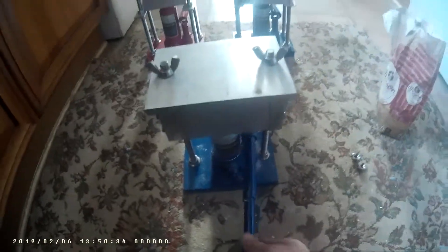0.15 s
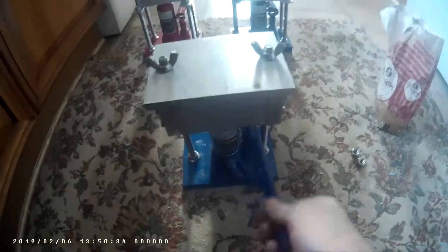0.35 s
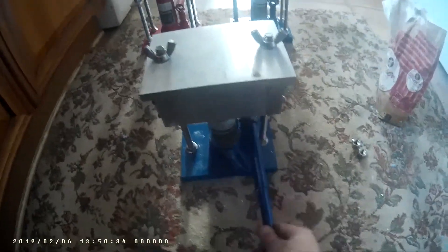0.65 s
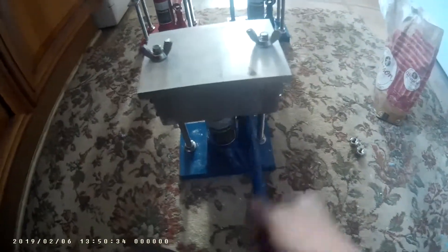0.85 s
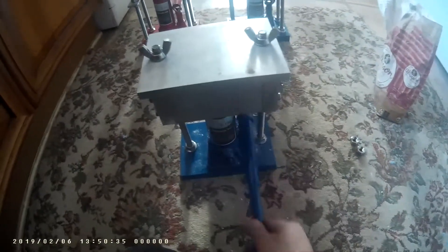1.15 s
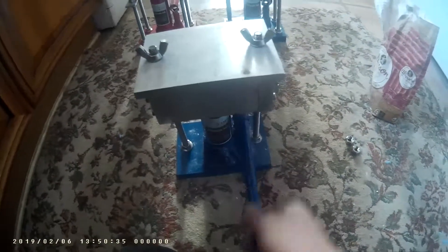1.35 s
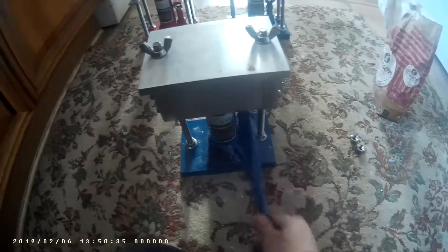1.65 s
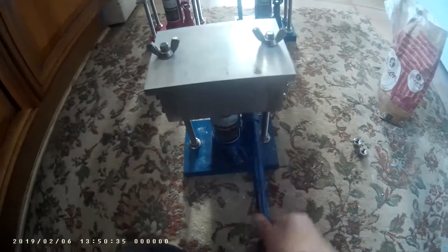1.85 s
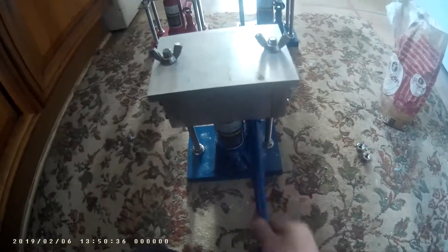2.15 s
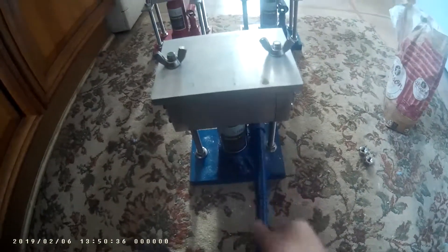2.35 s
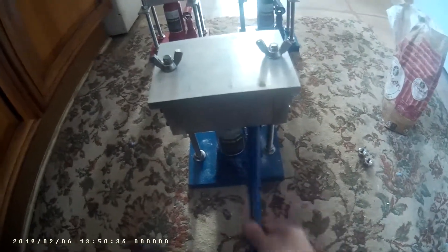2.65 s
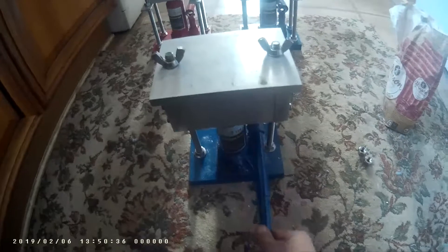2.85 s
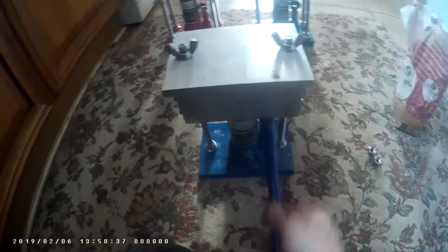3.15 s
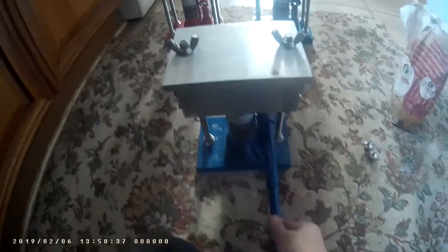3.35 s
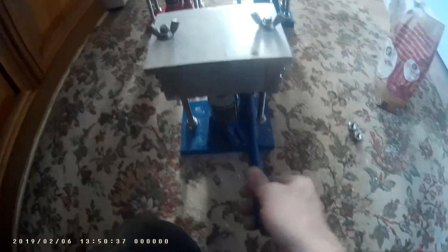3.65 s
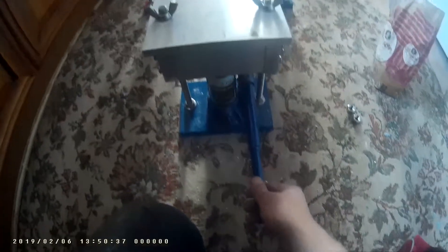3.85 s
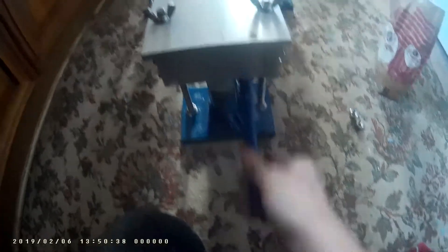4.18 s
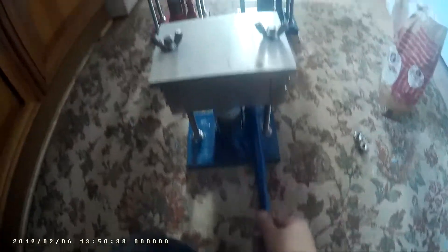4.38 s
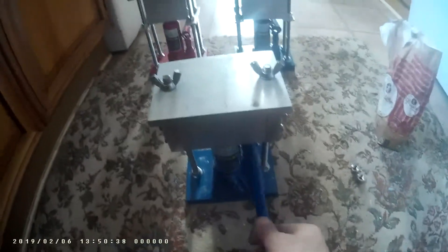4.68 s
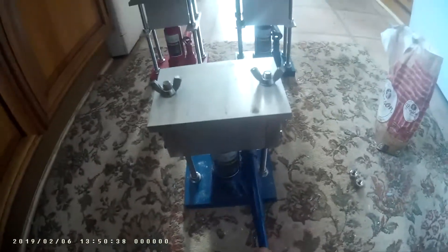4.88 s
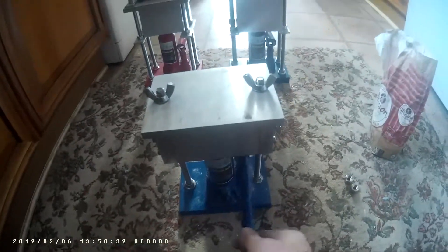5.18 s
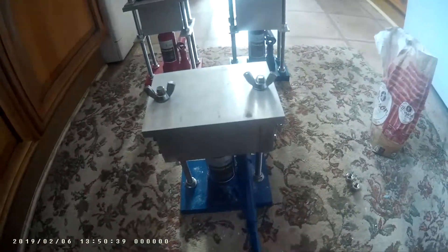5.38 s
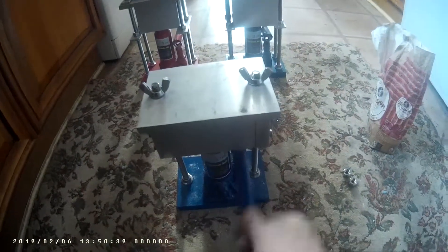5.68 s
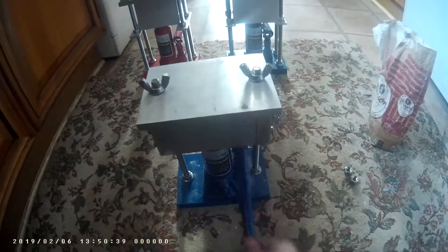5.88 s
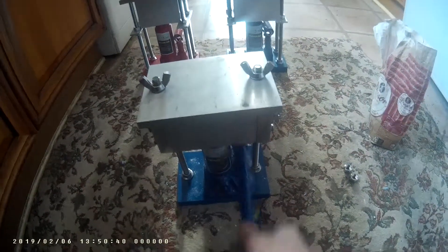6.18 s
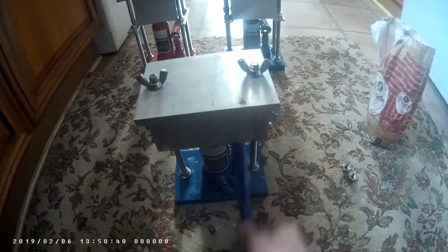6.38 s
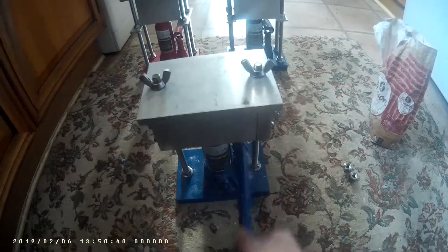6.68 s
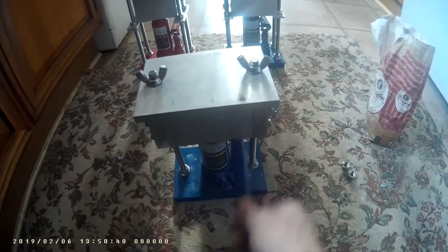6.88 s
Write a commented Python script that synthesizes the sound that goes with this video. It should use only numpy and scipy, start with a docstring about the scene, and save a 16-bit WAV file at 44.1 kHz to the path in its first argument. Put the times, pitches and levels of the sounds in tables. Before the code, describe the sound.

Steady, slightly uneven metallic pumping: crisp tick at the top of the stroke, heavier clack and short low thud at the bottom, roughly two full strokes each second. Each contact is a little burst of rattles, high chinks and dry pings that die almost at once. One short rising scrape comes late. The close microphone makes the steel sharp and bright, in a quiet carpeted room with soft air noise.

```python
"""Bottle jack pumped under a small press

A carpeted room, with a small camera's microphone close to the press: a bottle jack is pumped by hand.
At each turn of the stroke the loose handle, pins and links knock in a quick cluster of struck modes,
short pings and lumpy noise; at the bottom the press frame thuds in a few low modes.
One long stroke drags the handle in its socket as dense tiny contacts with a rising resonance.
Filtered noise makes the soft hum of the room; sparse fading reflections throw the jack's sound back."""
import sys
import numpy as np
from scipy import signal
from scipy.fft import rfft, irfft, next_fast_len
from scipy.io import wavfile
from scipy.ndimage import uniform_filter1d

SR = 44100
rng = np.random.default_rng(int(sys.argv[2]) if len(sys.argv) > 2 else 0)


def dump(signal):
    """Clip the signal to [-1, 1] and save it as 16-bit WAV at the path in sys.argv[1]."""
    limited = np.clip(np.atleast_2d(signal).T, -1, 1)
    pcm = np.round(limited * 32767).astype(np.int16)
    wavfile.write(sys.argv[1], SR, pcm)


N = 310111


def gain_of(db):
    """Decibels to gain."""
    return 10 ** (np.asarray(db) / 20)


def evened(x):
    """Scales to an rms of one."""
    return x / np.sqrt(np.mean(x ** 2) + 1e-20)


def read(points, hz):
    """Straight lines between points on a log-frequency axis."""
    f, value = np.transpose(points)
    return np.interp(np.log(hz + 1), np.log(f + 1), value)


def coloured(x, points):
    """Weights the spectrum of a sound by a table, then scales it to an rms of one."""
    size = next_fast_len(N)
    weight = gain_of(read(points, np.fft.rfftfreq(size, 1 / SR)))
    return evened(irfft(rfft(x, size) * weight)[:N])


def blows(s, size):
    """A train of single samples at the given times."""
    train = np.zeros(N, complex)
    np.add.at(train, np.clip(np.round(s * SR).astype(int), 0, N - 1), size)
    return train


def ring(train, hz, t60, rise_s):
    """One decaying mode struck by a train of blows; the force builds over rise_s."""
    turn = 2j * np.pi * hz
    rise = rise_s * SR
    force = signal.lfilter([1 / (1 + rise)], [1, -np.exp(turn / SR) / (1 + 1 / rise)], train)
    return signal.lfilter([1], [1, -np.exp((turn - np.log(1000) / t60) / SR)], force).real


def bounced(s, spread_s, loss_db, count):
    """Times and gains of each blow and of the small rebounds that follow it."""
    late = np.cumsum(rng.random((len(s), count)), 1) * spread_s
    late[:, 0] = 0
    fade_db = -loss_db * np.arange(count) * (0.32 + rng.random((len(s), count)))
    return (s[:, None] + late).ravel(), gain_of(fade_db).ravel()


AIR_DB = -51  # rms level of the room noise before the swell
# colour of the quiet room: (frequency [Hz], relative level per Hz [dB])
AIR_COLOUR = [(20, -9), (85, -2.5), (118, 6.5), (150, -1), (300, -3), (530, 4.5), (670, -7), (820, 0.5),
              (1300, -3.5), (3300, -11.5), (5500, -17.5), (6500, -10.5), (8200, -24), (15800, -30)]


def air(swell_db=1.2):
    """Room noise that swells a little, a few times a second."""
    slow = uniform_filter1d(rng.standard_normal(N), size=6000)
    swell = evened(uniform_filter1d(slow, size=6000))
    return gain_of(AIR_DB + swell_db * swell) * coloured(rng.standard_normal(N), AIR_COLOUR)


# how long the carpeted room holds each band: (frequency [Hz], time to fall 60 dB [s])
ROOM_DECAY = [(150, 0.39), (400, 0.5), (1040, 0.52), (2760, 0.29), (7280, .3), (14000, 0.28)]


def room(x):
    """Sparse reflections of random sign, each band dying at its own speed; three tails take turns."""
    taps = np.zeros((3, SR // 2))
    # one reflection at random within every 20 samples
    at = np.arange(340, SR // 2 - 20, 20) + rng.integers(0, 20, (3, 1085))
    np.put_along_axis(taps, at, rng.choice([-1., 1.], at.shape), 1)
    hz, t, bands = signal.stft(taps, SR, nperseg=256)
    decay = gain_of(-60 * t / read(ROOM_DECAY, hz)[:, None])
    tails = signal.istft(bands * decay, SR, nperseg=256)[1]
    phase = np.arange(N) / 3000 + np.arange(3)[:, None] / 3
    turn = np.sqrt(2 / 3) * np.cos(np.pi * phase)  # the three powers always add to one
    return signal.fftconvolve(x * turn, tails / np.linalg.norm(tails[0]), axes=1)[:, :N].sum(0)


# the handle dragging in its socket: (time [s], level [dB], resonance [Hz])
HANDLE_DRAG = [(4.76, -71, 1200), (4.8, -44, 1310), (4.86, -42, 1600), (4.93, -42, 1850),
               (4.99, -42.5, 2670), (5.05, -64, 3200)]
# colour of the drag: (frequency [Hz], relative level per Hz [dB])
DRAG_COLOUR = [(300, -2), (800, 10.5), (2000, 5.5), (6500, 8.5), (7500, 10), (11000, -22), (15500, -44)]


def slide(width_hz=500):
    """Dense tiny contacts; a resonance rises as the handle slides along."""
    s, db, hz = np.transpose(HANDLE_DRAG)
    t = np.arange(N) / SR
    grains = rng.standard_normal(N) * (rng.random(N) < 9000 / SR)  # about 9000 contacts a second
    # turn the grains down to 0 Hz, smooth them, and turn them back up to the moving pitch
    turn = np.exp(2j * np.pi * np.cumsum(np.interp(t, s, hz)) / SR)
    smooth = signal.lfilter([1], [1, -np.exp(-np.pi * width_hz / SR)], grains / turn)
    tone = evened((turn * smooth).real)
    level = gain_of(np.interp(t, s, db, -120, -120))
    return level * (coloured(grains, DRAG_COLOUR) + gain_of(-5) * tone)


# thuds of the press frame: (time [s], level before the mode levels [dB])
FRAME_THUDS = [(0.488, -39), (0.553, -25.5), (0.642, -40), (1.055, -27), (1.586, -24.5), (1.817, -60),
               (2.115, -29), (2.362, -44), (2.625, -26.5), (3.165, -26), (3.722, -27), (3.991, -50),
               (4.252, -28.5), (4.578, -39), (4.808, -34), (5.854, -30), (5.97, -29), (6.356, -31),
               (6.652, -41.5), (6.927, -25.5)]
# low modes of the press frame: (frequency [Hz], level [dB], time to fall 60 dB [s])
FRAME_MODES = [(205.3, -11.5, 0.081), (292, -5, 0.07), (355.3, -13.5, 0.15), (390.6, -3.5, 0.042),
               (540, -2, 0.011)]


def frame(rebounds=3):
    """The load settles on the frame in a few soft jolts; knocks in the handle shake it a little too."""
    thud_s, thud_db = np.transpose(FRAME_THUDS)
    s, fade = bounced(thud_s, spread_s=.02, loss_db=7.5, count=rebounds)
    size = fade * np.repeat(gain_of(thud_db), rebounds)
    knock_s, _, handle_db = knocks().T[:3]
    s = np.r_[s, knock_s]
    size = np.r_[size, gain_of(handle_db - 12)]
    chance = rng.standard_normal((len(s), 2, len(FRAME_MODES)))
    uneven = gain_of(1.15 * chance[:, 0]) * np.exp(2j * np.pi * chance[:, 1])
    size = size[:, None] * uneven
    return sum(gain_of(db) * ring(blows(s, size[:, m]), hz, t60, 0.0022)
               for m, (hz, db, t60) in enumerate(FRAME_MODES))


# Tick and click tables: (time [s], level [dB], treble against the usual [dB])
# slack taken up as the handle turns at the top, a crisp tick
TOP_SLACK = [(0.6434, -2, 4), (0.7614, -12.5, -1), (1.2885, -21, -6), (1.8177, -24.5, -7), (1.8273, -21, 9),
             (2.3137, -15.5, 7), (2.8606, -18.5, 7), (2.8889, -15.5, 2), (3.4141, -15, -5),
             (3.4456, -26, -1), (3.4487, -17.5, -6), (3.935, -15, -6), (4.5176, -27, 4), (4.5303, -20, 8),
             (4.9885, -25, -1), (5.0052, -19, -1), (5.3963, -31.5, 4), (5.5219, -13.5, -9),
             (5.5323, -30, -6), (6.081, -23.5, 3), (6.0945, -20, -1), (6.6103, -24, 1)]
# slack taken up as the handle turns at the bottom
BOTTOM_SLACK = [(0.1047, -17, 9), (0.4668, -5, -2), (0.9698, -14.5, 3), (1.0196, -9, 2), (1.4997, -16.5, 2),
                (2.0207, -31, 7), (2.2722, -30.5, -4), (2.5408, -32, 5), (3.6177, -12, 2),
                (3.6744, -19, -4), (4.152, -19.5, 2), (4.1996, -15, 4), (4.7615, -13.5, -1),
                (5.0105, -17.5, -1), (5.2473, -11.5, 2), (5.7617, -23, -4), (6.3095, -19, 3),
                (6.34, -18, 10), (6.886, -24.5, 7)]
# links clicking together before the bottom clack
LINK_TAPS = [(0.0615, -21.5, 0), (0.4845, -18, -3), (0.5163, -6, -9), (1.5421, -15, -6), (1.5474, -12, -5),
             (2.0692, -19.5, -7), (2.0722, -17, -5), (2.5775, -27, -11), (2.5822, -18, -5),
             (2.6073, -14, 1), (3.0727, -34.5, -1), (3.116, -26, -5), (3.127, -24, -13), (3.1354, -13.5, 8),
             (3.6653, -16, -14), (4.2051, -15.5, -5), (5.201, -36, -10), (5.8086, -30, -3),
             (5.8138, -16, 0), (6.3549, -11, -2)]
# light rattles of the pins
PIN_RATTLES = [(0.0378, -33, 1), (0.0525, -30, 2.5), (0.218, -41, 5), (0.344, -34.5, -6), (0.5397, -6, 2.5),
               (0.5495, -7.5, 0), (0.734, -25, 0), (0.8254, -16, 2), (1.0289, -10, -0.5), (1.347, -19.5, 3),
               (1.7688, -38, -3), (1.8895, -16, 3), (2.0881, -11.5, -7), (2.377, -15, 0), (2.3857, -26, 8),
               (2.5976, -20, -1), (2.6153, -17, -7), (2.6195, -13, -6), (2.8175, -57, -4), (2.903, -12, -6),
               (2.9344, -18, 3), (3.4822, -18, 1), (3.4914, -21, 2), (4.01, -13.5, 1), (4.2144, -15, 1),
               (4.23, -9, 3), (4.5537, -12.5, -8), (4.7755, -10.5, 6), (4.791, -5, 1.5), (4.8469, -19, -7),
               (5.0294, -8, -7), (5.528, -12, -1), (5.5938, -13, 3), (5.8257, -7, -4.5), (6.0584, -23, -2),
               (6.11, -9.5, -1.5), (6.159, -22, 8), (6.3659, -3, 2.5), (6.6795, -20, 7), (6.9003, -11, 8.5)]
# a small part chinks brightly: (time [s], level [dB], treble against the usual [dB], pitch [Hz])
SMALL_CHINKS = [(0.79, -3.5, -6, 9700), (1.2937, -17.5, 3, 9700), (1.5657, -3.5, 1.5, 8530),
                (1.8524, -13, 1.5, 9590), (2.33, -15, -1, 9640), (2.879, -17, 2, 9600),
                (3.4382, -19.5, 2, 9660), (3.684, -9.5, -5, 11000), (3.9706, -17.5, -3, 9660),
                (4.5434, -11.5, 4.5, 9300), (4.9995, -14, -5, 10600), (5.018, -9.5, 3.5, 9700),
                (5.0227, -23, -8, 9610), (5.2657, -8, -7, 12000), (5.5424, -33, 6, 8400),
                (5.553, -14.5, -1, 8300), (6.0997, -19, 2, 9550), (6.6335, -20, 3.5, 9600),
                (6.6413, -17.5, -1, 9600), (6.91, -3, -13, 9800)]
# the handle lands with weight and rings low:
# (time [s], level [dB], treble [dB], weight [dB], low pitch [Hz], high pitch [Hz])
HANDLE_CLACKS = [(0.6441, -14, -16, 3.5, 2950, 6500), (0.7679, -8.5, 8, -11.5, 2200, 6090),
                 (0.8059, -14, -14, -4.5, 2250, 5400), (1.0407, -11.5, -4, -1.5, 3200, 6500),
                 (1.3295, -10, -2, -5, 4700, 5400), (1.3551, -19.5, 1, 2, 3230, 5070),
                 (1.5726, -17, -6, -3, 1900, 6300), (1.8687, -11.5, -5, -2.5, 3120, 5200),
                 (2.0993, -10, 0, -7, 3800, 6140), (2.355, -13, -6, -1.5, 3520, 5000),
                 (2.9085, -8.5, -3.5, -4, 3430, 6060), (3.1506, -10.5, 0, -4.5, 2930, 6280),
                 (3.4593, -14.5, -6, 1, 4800, 5800), (3.471, -14.5, -3, -0.5, 4680, 6360),
                 (3.6985, -11.5, -2, -1.5, 4870, 6550), (3.9871, -12.5, 1, 0.5, 1890, 4890),
                 (4.2405, -14, -6, -1.5, 2560, 5250), (4.563, -9, 0, -6.5, 4600, 5220),
                 (4.5728, -7.5, 2, -4.5, 3830, 6600), (5.0422, -9.5, -3, -4.5, 4950, 5600),
                 (5.0472, -8.5, -1, -8.5, 4040, 5190), (5.2889, -17.5, 0, -0.5, 2810, 5890),
                 (5.5702, -7.5, 6, -2.5, 3900, 5260), (5.8387, -9, 0, -5, 3890, 6170),
                 (5.9718, -11.5, -5, 0.5, 4080, 5500), (6.1266, -11.5, -2, -0.5, 3040, 5860),
                 (6.1476, -22, 3, 1, 2750, 6200), (6.3749, -12, -3, -4.5, 4430, 6300),
                 (6.3859, -12.5, 0, -1.5, 4440, 5840), (6.6598, -12, -5, -10.5, 2370, 6050),
                 (6.6908, -16.5, -1, 2.5, 4800, 6370)]
# How each contact shares its blow:
# (pin [dB], handle [dB], link [dB], bright ring [dB], cleanness [dB])
# a clean contact pings louder, hisses less and rebounds less
TOP_PARTS = (-3.5, -21, -9, -19, 2.5)
BOTTOM_PARTS = (-6, -21.5, -7.5, -24, 5)
LINK_PARTS = (-11.5, -20.5, -12.5, -20, -2.5)
PIN_PARTS = (-6.5, -24.5, -19, -18.5, 0.5)
CHINK_PARTS = (-9, -21, -20, -12.5, -2.5)
CLACK_PARTS = (-5.5, -10.5, -9, -18.5, -2)
# Contact pitches: (low [Hz], high [Hz])
TOP_PITCHES = (3200, 5650)
BOTTOM_PITCHES = (4216, 5630)
LINK_PITCHES = (2080, 6060)
PIN_PITCHES = (4370, 6685)
CHINK_EXTRA_HZ = 15640  # second contact pitch of every chink


def knocks():
    """All knocks as rows (time s; pin, handle, link, bright, cleanness dB; two contact pitches Hz)."""
    plain = [(TOP_SLACK, TOP_PARTS, TOP_PITCHES), (BOTTOM_SLACK, BOTTOM_PARTS, BOTTOM_PITCHES),
             (LINK_TAPS, LINK_PARTS, LINK_PITCHES), (PIN_RATTLES, PIN_PARTS, PIN_PITCHES)]
    rows = [(s, db, share, treble_db, 0, *hz)
            for table, share, hz in plain for s, db, treble_db in table]
    rows += [(s, db, CHINK_PARTS, treble_db, 0, CHINK_EXTRA_HZ, hz)
             for s, db, treble_db, hz in SMALL_CHINKS]
    rows += [(s, db, CLACK_PARTS, *rest) for s, db, *rest in HANDLE_CLACKS]
    return np.array([(s, *np.add(share, [db, db + weight_db, db, db + treble_db, 0]), *hz)
                     for s, db, share, treble_db, weight_db, *hz in rows])


def pings(s, hz, size, t60=0.014, rise_s=0.0002):
    """The touching faces themselves ring for a moment, at a pitch of their own."""
    t = np.arange(1500) / SR
    tones = np.sin(2 * np.pi * (hz[:, None] * t + rng.random((len(s), 1))))
    shape = gain_of(-60 * t / t60) * (1 - np.exp(-t / rise_s))
    at = np.round(s * SR).astype(int)[:, None] + np.arange(len(t))
    out = np.zeros(N + len(t))
    np.add.at(out, at, size[:, None] * tones * shape)
    return out[:N]


def grain(depth_db):
    """Uneven gain that breaks a hiss into tiny rattles."""
    lumps = evened(uniform_filter1d(rng.standard_normal(N), size=60))
    return evened(gain_of(depth_db * lumps))


# limits of the ring of handle, links, pins and bright part, in that order: (frequency [Hz])
PART_LIMITS = [700, 1500, 4800, 7900, 15800]
# how fast each part takes up a blow: (rise [s])
PART_RISE = [0.0046, 0.00078, 0.0011, 0.0014]
# modes of the steel linkage: (frequency [Hz], relative level [dB], time to fall 60 dB [s])
STEEL_MODES = [(985, 12, 0.023), (1131.5, 0, 0.068), (1265, -7.5, 0.064), (1890, 3, 0.024),
               (2329, 5.5, 0.017), (2684, -1, 0.028), (2990, 1, 0.025), (3230, 7.5, 0.014),
               (3783, 11, 0.011), (4190, 3, 0.014), (4680, 5, 0.013), (5020, -51, 0.005), (4970, 22, 0.007),
               (5990, 11.5, 0.006), (6180, 5.5, 0.06), (6620, 19, 0.0077), (6446, 2, 0.02),
               (7320, -2.5, 0.016), (6740, 7, 0.025), (8670, -1.5, 0.034), (9280, -5, 0.01),
               (9600, 2, 0.027), (10320, 4.5, 0.0089), (12030, -1, 0.0043), (13300, -16, .035),
               (14900, -12, 0.018)]


def steel_ring(s, part_gain, low_hz, high_hz, favour_db=13.0, scatter_db=6.5, seat_shift=0.0079):
    """Each knock rings all modes unevenly, favouring those near its two contact pitches."""
    hz, db, t60 = np.transpose(STEEL_MODES)
    part = np.searchsorted(PART_LIMITS, hz) - 1
    # 0.04 is the reach of a contact pitch in natural-log frequency
    near = sum(np.exp(-(np.log(f[:, None] / hz) / 0.04) ** 2) for f in (low_hz, high_hz))
    chance = rng.standard_normal((len(s), 3, len(hz)))
    share = gain_of(db + favour_db * near + scatter_db * chance[:, 0])
    for k in range(len(PART_RISE)):  # a blow's energy is shared out among the modes of a part
        share[:, part == k] /= np.linalg.norm(share[:, part == k], axis=1, keepdims=True)
    size = share * part_gain[part].T * np.exp(2j * np.pi * chance[:, 1])
    seat = np.sign(chance[:, 2])  # loose parts sit differently at each blow, tuning a mode up or down
    out = np.zeros(N)
    for m in range(len(hz)):
        for way in (-1, 1):
            train = blows(s, size[:, m] * (seat[:, m] == way))
            out += ring(train, hz[m] * (1 + way * seat_shift), t60[m], PART_RISE[part[m]])
    return out


# raw contact noise of each part against its ring: (level [dB])
CRACK_LEVEL = [-16.5, -9.5, -10, -7]
# how lumpy the contact noise of each part is: (depth [dB])
GRAIN_DEPTH = [1.5, 2.5, 3, 4.5]
# dense ring of the press, per part: (level [dB]), then (time to fall 60 dB [s])
SHIVER_LEVEL = [-23, -25.5, -25, -22]
SHIVER_DECAY = [0.52, 0.42, 0.21, 0.2]
# colour of the contact noise: (frequency [Hz], relative level per Hz [dB])
GRIT_COLOUR = [(700, 4), (6500, 6.5), (9500, -2.5), (12000, -4), (15800, -14)]


def contact_noise(s, part_gain, clean_db, crack_t60=0.018):
    """Lumpy band noise per part: a short crack at each blow and the longer shiver of the press."""
    out = np.zeros(N)
    for k in range(len(CRACK_LEVEL)):
        band = signal.butter(N=4, Wn=PART_LIMITS[k:k + 2], btype="band", fs=SR, output="sos")
        grit = coloured(signal.sosfilt(band, rng.standard_normal(N)), GRIT_COLOUR)
        # unrelated noises add in power, so levels double in dB and decay times halve
        energy = blows(s, (part_gain[k] * gain_of(-clean_db / 2)) ** 2)
        crack = gain_of(2 * CRACK_LEVEL[k]) * ring(energy, 0, crack_t60 / 2, PART_RISE[k])
        shiver = gain_of(2 * SHIVER_LEVEL[k]) * ring(energy, 0, SHIVER_DECAY[k] / 2, 0.00074)
        out += grit * grain(GRAIN_DEPTH[k]) * np.sqrt(abs(crack + shiver))
    return out


def linkage(ping_db=-3.5, rebounds=3):
    """Loose steel parts knock and rebound: ringing modes, face pings and contact noise."""
    rows = knocks()
    _, pin_db, handle_db, link_db, bright_db, clean_db, low_hz, high_hz = np.repeat(rows, rebounds, axis=0).T
    s, fade = bounced(rows.T[0], spread_s=.007, loss_db=11, count=rebounds)
    fade = fade * gain_of(-2 * clean_db * (fade < 1))  # cleanness changes the rebounds, not the first blow
    part_gain = gain_of([handle_db, link_db, pin_db, bright_db]) * fade
    _, link, pin, bright = part_gain
    out = steel_ring(s, part_gain, low_hz, high_hz)
    out += gain_of(ping_db) * pings(s, low_hz, link * gain_of(clean_db))
    out += gain_of(ping_db) * pings(s, high_hz, np.where(high_hz > PART_LIMITS[3], bright, pin))
    return out + contact_noise(s, part_gain, clean_db)


def scene():
    """Room air, then the jack and its reflections from the room."""
    jack = linkage() + frame() + slide()
    room_db = -11
    return (jack + gain_of(room_db) * room(jack) + air())[None]


PORT_HZ, PORT_WIDTH_HZ, PORT_DB = 6550, 300, -3  # resonance of the microphone port
EDGE_HZ = 16200  # upper band limit


def record(dry):
    """The close microphone's port rings in the treble; then the band limit."""
    port = signal.lfilter(*signal.iirpeak(PORT_HZ, PORT_HZ / PORT_WIDTH_HZ, SR), dry)
    heard = dry + gain_of(PORT_DB) * port
    lowpass = signal.firwin(511, EDGE_HZ, window=("kaiser", 9), fs=SR)
    return signal.oaconvolve(heard, lowpass[None], "same")


dry = scene()
out = record(dry)
dump(out)
```